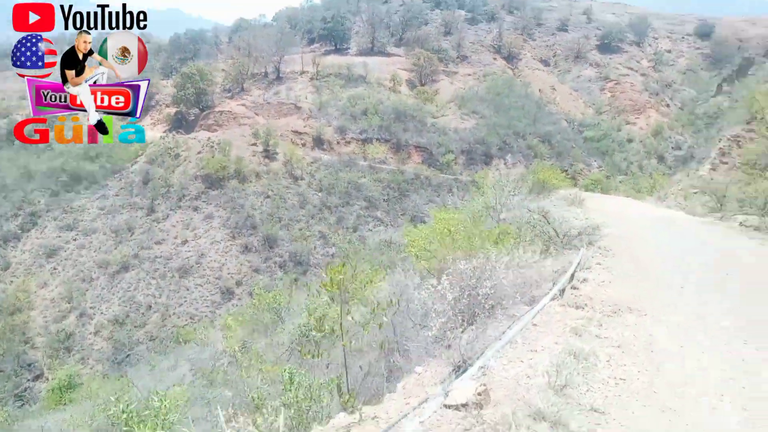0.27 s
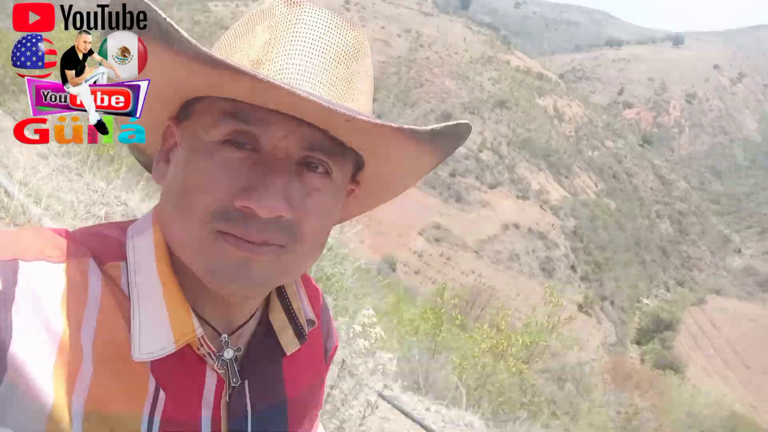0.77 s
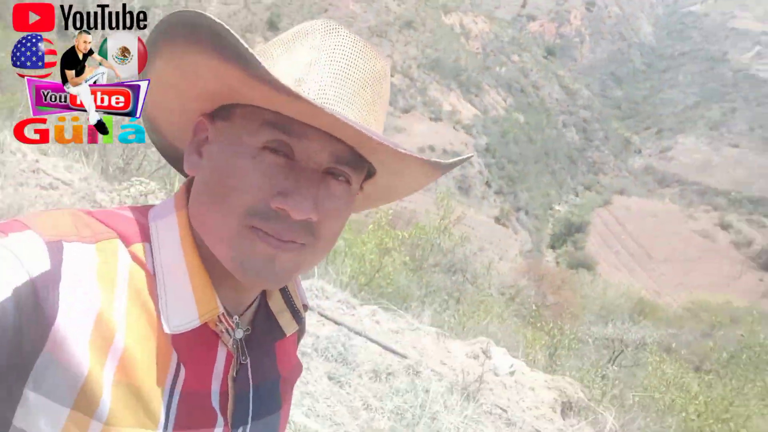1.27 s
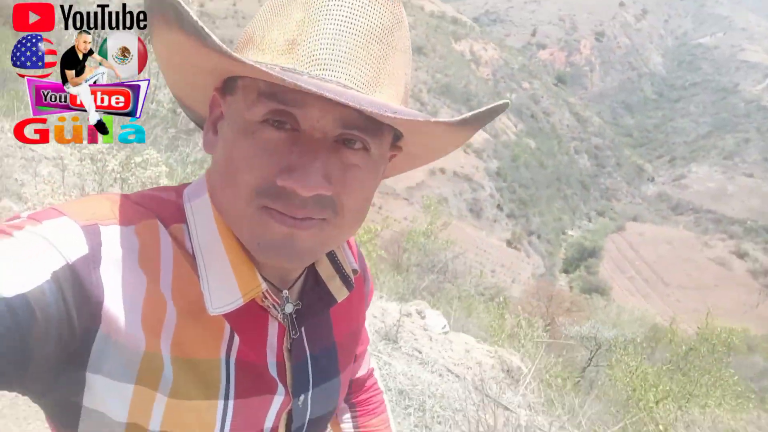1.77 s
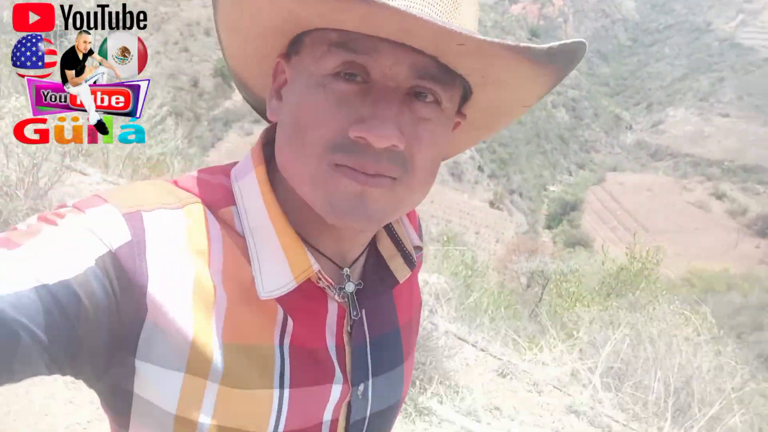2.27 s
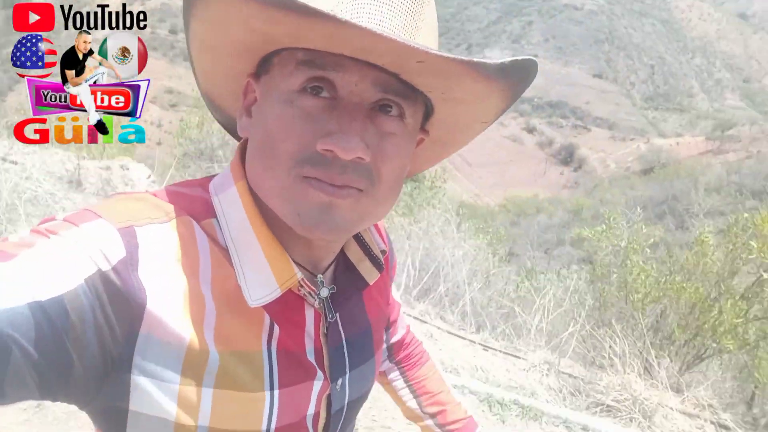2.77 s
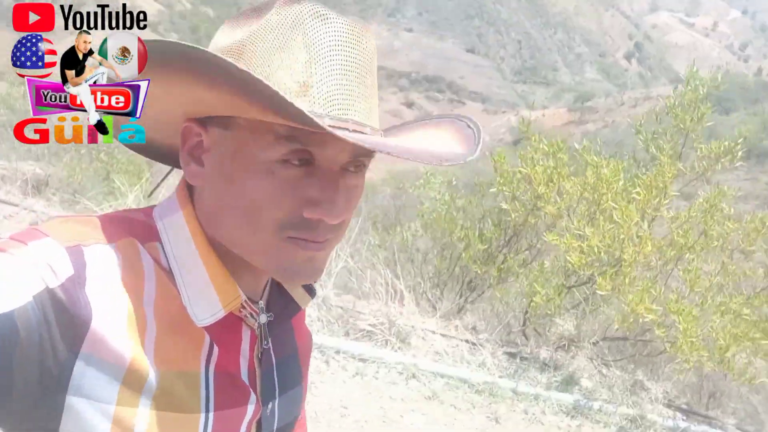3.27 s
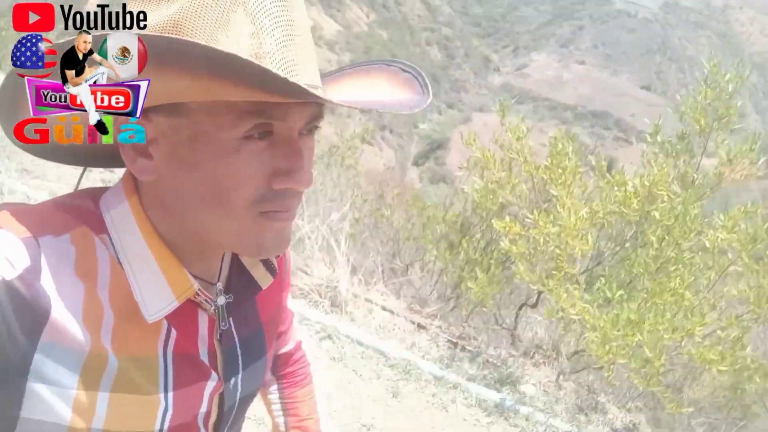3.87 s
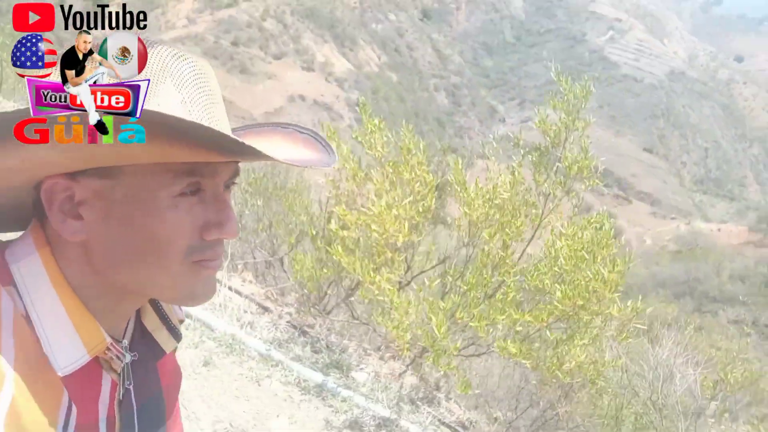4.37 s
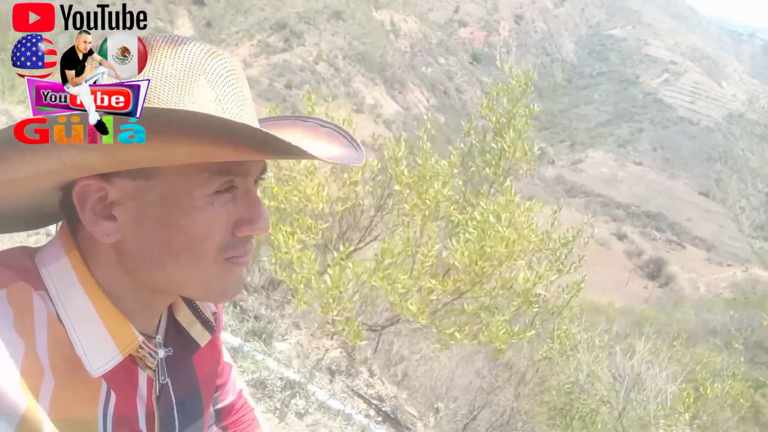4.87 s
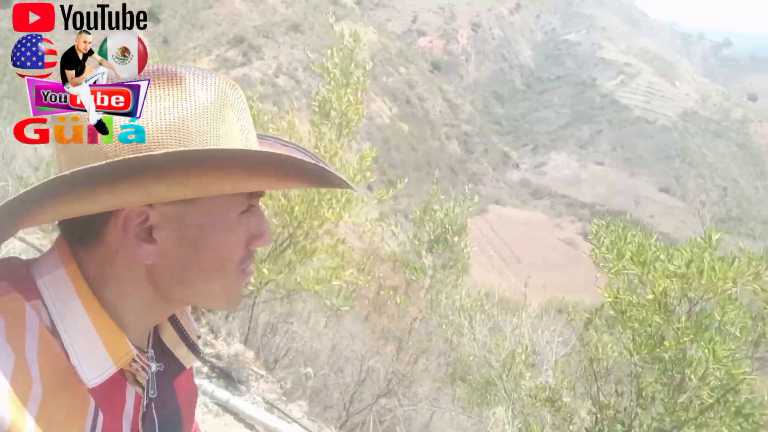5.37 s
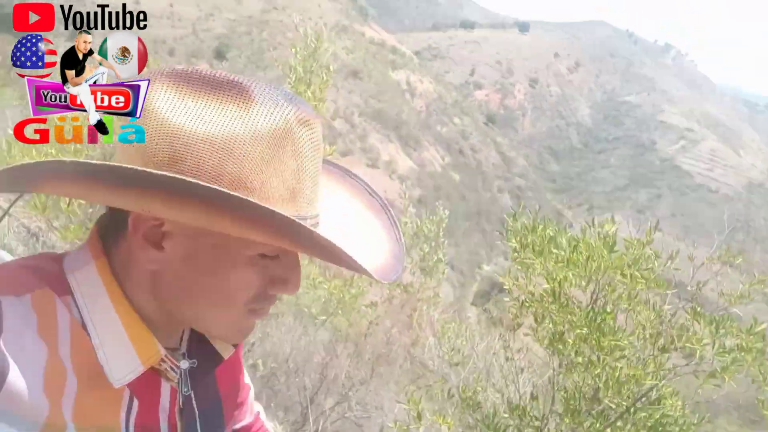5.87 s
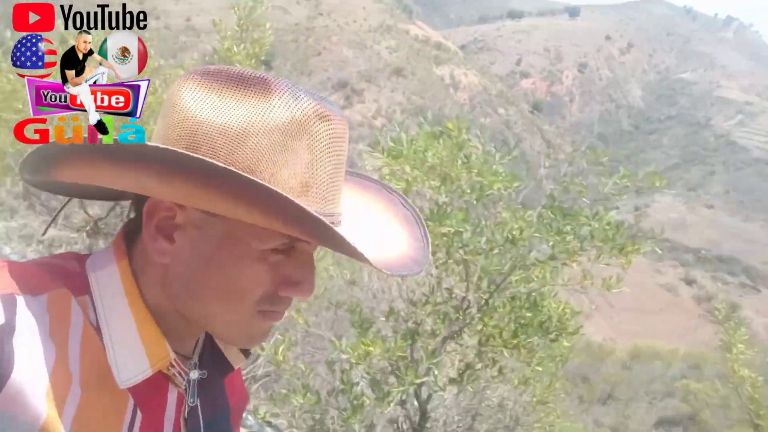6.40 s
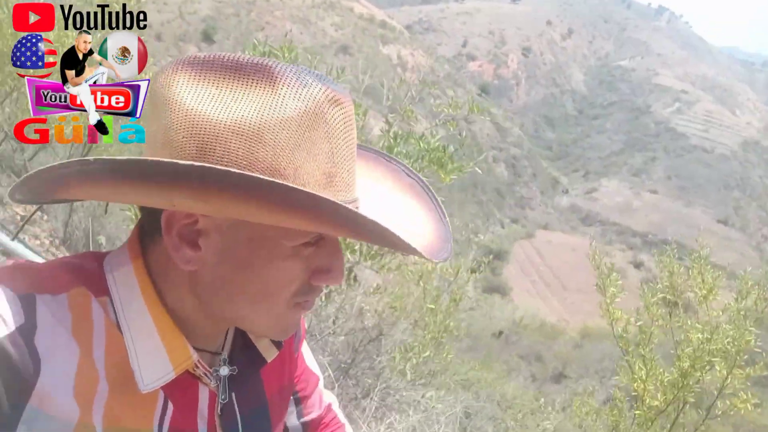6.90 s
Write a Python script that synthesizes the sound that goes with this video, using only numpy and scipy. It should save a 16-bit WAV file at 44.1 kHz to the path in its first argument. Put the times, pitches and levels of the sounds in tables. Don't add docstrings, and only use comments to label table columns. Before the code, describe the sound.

Slow footsteps crunch on gravel, a hard knock hits the handheld microphone, then after a brief silence heavy wind rumbles and slaps over continuing steps.

```python
import sys
import numpy as np
from scipy import signal
from scipy.fft import rfft, irfft
from scipy.io import wavfile
from scipy.ndimage import uniform_filter1d, minimum_filter1d

SR = 44100
rng = np.random.default_rng(int(sys.argv[2]) if len(sys.argv) > 2 else 0)


def volts_from_db(level):
    exponent = np.asarray(level, float) / 20
    return 10 ** exponent


def master_out(mix):
    frames = np.transpose(np.atleast_2d(mix))
    ceiling = np.clip(frames, -1, 1)
    pcm = np.round(ceiling * 32767).astype(np.int16)
    wavfile.write(sys.argv[1], SR, pcm)


N = 314874
TIME = np.arange(N) / SR
PORT_LAG = 5
KNOCK_S = .4572
CUT_S, FADE_OUT_S, GAP_S, FADE_IN_S = .652, 0.017, 0.031, 0.16


# (time [s], rumble level [dB], eddy breaking re rumble [dB])
AIRFLOW_LEFT = [(0.0, -43.5, -1), (.2, -41.5, -36), (.55, -54, -56), (.66, -27.5, -2), (1.0, -26, -16),
                (1.5, -25.5, -14), (1.65, -32.5, -39), (1.77, -30, -13.5), (2.1, -33.5, -31.5),
                (2.45, -29.5, -35), (3.08, -27.5, -22), (3.2, -20.5, -3.5), (4.2, -24.5, -13),
                (4.62, -18, -10), (5.2, -22.5, -10.5), (5.94, -24, -14.5), (6.3, -19, -3.5),
                (7.04, -18, -4.5)]
AIRFLOW_RIGHT = [(0.0, -33.5, -3), (.15, -48.5, 14), (.4, -36.5, -23), (.56, -34.5, -31), (.67, -49, -4),
                 (.78, -49, -23), (1.0, -42.5, 1), (1.22, -47, 4.5), (1.45, -41, -36), (1.9, -41.5, -34),
                 (2.5, -43, -19.5), (2.95, -33.5, -15), (3.15, -29, 10.5), (4.05, -32.5, -0.5),
                 (4.6, -29.5, -15.5), (5.2, -39.5, -13.5), (6.3, -44.5, -32), (7.04, -39.5, -36.5)]
# (time [s], half length [s], lift [dB])
GUSTS_AT_LEFT = [(0.902, 0.054, 6), (1.421, 0.027, 4), (1.894, 0.15, 11.5), (2.412, 0.027, -4),
                 (2.624, 0.041, 9), (3.311, 0.074, 7.5), (3.505, 0.019, -2.5), (3.63, 0.047, 2),
                 (4.082, 0.054, -0.5), (4.495, 0.1, 1), (4.78, 0.058, 3), (4.848, 0.026, 4),
                 (4.882, 0.014, 3.5), (5.016, 0.036, 5.5), (5.264, 0.086, -3), (5.464, 0.31, 4.5),
                 (6.092, 0.034, 0), (6.43, 0.17, 3.5), (6.54, 0.0068, -4.5), (6.581, 0.011, -5.5),
                 (6.592, 0.18, 3), (6.646, 0.0053, -8), (6.706, 0.019, -4.5), (6.758, 0.02, -1.5),
                 (6.826, .008, -3.5), (6.843, 0.067, 3), (6.935, 0.025, -5), (6.977, 0.0066, -3),
                 (7.053, 0.21, 5.5), (7.094, 0.0066, -5),
                 (0.782, 0.011, -5), (0.926, 0.015, 1.5), (0.944, 0.012, -12.5), (0.97, 0.01, 2.5),
                 (1.007, 0.012, 7.5), (1.138, 0.047, 1), (1.188, 0.016, -9.5), (1.297, 0.018, -5),
                 (1.34, 0.015, 3), (1.398, 0.015, 4), (1.466, 0.0166, -14.5), (1.473, 0.038, 6.5),
                 (1.538, 0.0076, 2), (1.622, 0.027, -8), (1.908, 0.036, 4), (1.99, 0.019, -0.5),
                 (2.105, 0.018, 13), (2.163, 0.045, -6), (2.225, 0.024, 10), (2.257, 0.016, -8),
                 (2.303, 0.0075, -12), (2.335, 0.016, 6), (2.596, 0.028, -4.5), (2.73, 0.012, 3),
                 (2.816, 0.031, -8.5), (2.926, 0.018, 7.5), (2.939, 0.008, -11), (3.023, 0.023, -5),
                 (3.177, 0.016, 2), (3.385, 0.0086, 5), (3.634, 0.026, 5.5), (3.756, 0.019, 8),
                 (3.84, 0.014, -4.5), (3.999, 0.085, 5), (4.088, 0.0043, 7.5), (4.164, 0.037, 3.5),
                 (4.423, 0.02, -1), (4.479, 0.027, 5), (4.656, 0.042, -8.5), (4.686, 0.016, 4.5),
                 (4.784, 0.013, 4.5), (4.856, 0.012, 3), (4.914, 0.0092, 5), (5.043, 0.01, 7),
                 (5.234, 0.02, 5), (5.341, 0.0079, 4.5), (5.51, 0.014, -7.5), (5.572, 0.019, 1.5),
                 (5.664, 0.015, -0.5), (5.837, 0.01, 3), (5.899, 0.022, -4.5), (5.945, 0.054, 4),
                 (6.125, 0.038, 7), (6.146, 0.023, -8.5), (6.376, 0.024, 4.5), (6.736, 0.019, 4),
                 (7.016, 0.0076, -10)]
GUSTS_AT_RIGHT = [(1.696, 0.12, 2), (2.096, 0.057, 7), (2.214, 0.061, 11), (2.413, 0.044, 4.5),
                  (2.53, 0.069, 3.5), (2.773, 0.2, 5.5), (2.992, 0.13, -6.5), (3.308, 0.046, -8),
                  (3.436, 0.065, 5.5), (3.635, 0.073, 1.5), (4.224, .1, -2), (4.386, 0.066, 0.5),
                  (4.909, 0.16, 8), (5.399, 0.11, 4), (5.608, 0.082, -5.5), (5.743, 0.19, 9.5),
                  (6.4, 0.061, 3.5), (6.576, 0.073, -15.5), (6.824, 0.057, 6.5)]
# (time [s], peak level [dB], pitch [Hz])
EDDY_SLAPS = [(0.968, -17.5, 227), (1.083, -13, 99), (1.481, -13, 212), (1.812, -12.5, 199),
              (1.886, -9.5, 164), (2.895, -19.5, 184), (3.173, -13, 259), (3.304, -10, 153),
              (3.379, -6, 233), (3.616, -15.5, 148.5), (3.742, -13.5, 161), (3.798, -16.5, 180),
              (3.97, -25, 167), (4.459, -8.5, 129), (4.563, -13.5, 144), (4.693, -13, 238),
              (4.761, -21, 195), (4.939, -11.5, 176), (5.046, -16.5, 188), (5.12, -14.5, 102.5),
              (5.328, -14.5, 166), (5.539, -15.5, 175), (5.971, -10.5, 190), (6.095, -11.5, 150),
              (6.246, -12, 220), (6.285, -6, 146), (6.553, -1, 220), (6.727, -14, 225), (6.868, -19, 300),
              (6.915, -6.5, 205), (6.952, -7, 342)]
# (time [s], peak level [dB], pitch [Hz], left minus right [dB])
WIND_POPS = [(0.157, -32.5, 1160, 11), (0.196, -32, 414, -31), (1.015, -29, 600, -28),
             (1.137, -28.5, 390, -22), (1.155, -30.5, 497, -11), (1.234, -24.5, 596, -23),
             (1.395, -20.5, 329, 35.5), (1.777, -32, 482, 28), (1.889, -27, 358, 37),
             (2.078, -39, 474, -26), (2.207, -31.5, 800, -15), (2.493, -39, 534, -23),
             (2.907, -28.5, 336, 19), (3.088, -31.5, 520, -19), (3.263, -22.5, 593, -6),
             (3.304, -11.5, 358, 16), (3.332, -8, 408, 23), (3.37, -22, 499, 10), (3.422, -24, 603, -1),
             (3.551, -28.5, 537, -9.5), (4.072, -24, 455, -16), (5.05, -16, 411, 38),
             (5.231, -23.5, 450, 19), (5.537, -28, 394, 24), (5.611, -31, 554, 34), (5.961, -24, 368, 43),
             (6.112, -14.5, 330, 53), (6.352, -12, 427, 33), (6.384, -14, 536, 39.5),
             (6.45, -16.5, 450, 49), (6.49, -10, 426, 62), (6.548, -15, 408, 50), (6.598, -31, 387, 51),
             (6.694, -13.5, 452, 64), (6.731, -7, 353, 54), (6.838, -13, 390, 35.5),
             (6.863, -13.5, 440, 45), (6.954, -16.5, 424, 48.5), (6.998, -19.5, 620, 56),
             (7.068, -11, 482, 55)]


def wind():
    slaps, pops = np.zeros(N), np.zeros((2, N))
    for s, db, hz in EDDY_SLAPS:
        add_cycles(slaps, s, hz, .45, volts_from_db(db + 2.5))
    for s, db, hz, pan_db in WIND_POPS:
        add_cycles(pops, s, hz, .35, volts_from_db(db - 0.5) * sides(pan_db)[:, None])
    harder = 0.89
    left = port(*flow(AIRFLOW_LEFT, GUSTS_AT_LEFT, harder)) + slaps
    right = port(*flow(AIRFLOW_RIGHT, GUSTS_AT_RIGHT, harder))
    return np.array([left, right]) + band(pops, 64.0, 1700.0)


def flow(curve, gusts, harder):
    s, db, break_db = np.transpose(curve)
    lift_db = sum(lift * np.exp(-((TIME - middle) / half) ** 2) for middle, half, lift in gusts)
    return np.interp(TIME, s, db) + lift_db, np.interp(TIME, s, break_db) + harder * lift_db


# (frequency [Hz], level [dB])
RUMBLE_TONE = [(25, -41.5), (50, -7.5), (80, 1.5), (130, 3), (220, -3.5), (350, -18), (600, -45),
               (1200, -86)]
# (frequency [Hz], level [dB])
EDGE_TONE = [(60, -31.5), (200, 4.5), (330, 1.5), (520, -10.5), (750, -20.5), (1100, -59), (2000, -92.5)]
# (frequency [Hz], level [dB])
SPIT_TONE = [(300, -26.5), (650, -2), (950, -12), (1400, -27), (2000, -44.5), (3200, -74)]


def port(rumble_db, edge_db):
    edge_db = np.minimum(edge_db, 2.5)
    burst, breaking = walk(26.), walk(60.)
    throb = volts_from_db(0.18 * burst + 1.3 * walk(11.))
    rumble = unit(colour(rng.standard_normal(N) * throb, RUMBLE_TONE), 71, 270)

    eddy_db = 2.2 * burst + 3.15 * breaking + 2.0 * walk(19.0)
    eddies = grains(700., 1.4) * volts_from_db(np.minimum(eddy_db, 9.))
    edge = unit(colour(eddies, EDGE_TONE), 267, 570)

    spit_drive = volts_from_db(np.minimum(1.6 * breaking + 0.92 * burst, 6.))
    spit = unit(colour(eddies * spit_drive, SPIT_TONE), 570, 1000)
    spit = spit * volts_from_db(1.87 * edge_db + 0.15 * rumble_db - 8.5)
    return volts_from_db(rumble_db) * (rumble * volts_from_db(-2.0) + volts_from_db(edge_db - 3.5) * (edge + spit))


# (frequency [Hz], level [dB])
CRUNCH_TONE_LEFT = [(150, -22), (500, 8), (1100, 11.5), (2000, 9.5), (2800, -1.5), (3800, -7), (5200, -23)]
CRUNCH_TONE_RIGHT = [(150, -12), (500, 14.5), (1000, 15), (2000, 2.5), (3200, 0), (4200, -16), (6000, -30)]
# (frequency [Hz], level [dB])
FINE_GRIT_TONE = [(3000, -44.5), (4500, 2.5), (5700, 5), (7400, -20.5), (9600, -7), (12000, -13),
                  (14500, -6.5), (16000, -34)]
# (time [s], length [s], level [dB], sharp grit re crunch [dB], left minus right [dB])
SOLE_ROLLS = [(0.0, 0.13, -50, -18, 18), (.2, 0.082, -56, -27, 0.5), (.37, 0.073, -65.5, -15, -4.5),
              (.47, 0.21, -45, -10.5, 6), (1.13, 0.095, -55, -23.5, 6), (1.665, 0.079, -56.5, -4.5, 6.5),
              (2.19, 0.13, -55, -15, 7), (2.715, 0.12, -56, -7, 10.5), (3.23, 0.053, -55, -7, 5),
              (3.755, 0.071, -52.5, -10.5, 11), (4.262, 0.053, -53, -11, 7.5), (4.78, 0.064, -63.5, -3, 6),
              (5.335, .02, -64, -16, 7.5), (5.8, 0.025, -49, -6, 8), (5.88, 0.0059, -67.5, -3.5, 9.5),
              (6.3, 0.033, -56.5, -13.5, 8), (6.85, 0.026, -64, -25.5, 9.5)]


def steps():
    crunch, sharp = load()
    rolls = np.array(SOLE_ROLLS)
    level = crunch * volts_from_db(-4.0) * sides(np.interp(TIME, rolls[:, 0], rolls[:, 4]))
    slips = volts_from_db(2.6 * walk(130.))
    grit = grains(3200., 4.2) * slips
    other = 0.81 * np.roll(grit, PORT_LAG) + 0.52 * grains(3600.0, 3.1) * slips

    fine = grains(5100.0, 2.3) * slips ** 1.2 * volts_from_db(4.0 * walk(70.))
    fine = unit(colour(fine, FINE_GRIT_TONE), 3500, 8300)
    fine = fine * sharp / (crunch + 1e-12)

    both = clumps(np.array([grit, other]))
    grit, other = both + volts_from_db(4.) * (TIME < CUT_S) * band(both, 2900., 6300.0)
    left = unit(colour(grit, CRUNCH_TONE_LEFT), 1747, 4000) + fine * volts_from_db(-2.5)
    right = unit(colour(other, CRUNCH_TONE_RIGHT), 1800, 4500) + np.roll(fine, PORT_LAG) * volts_from_db(-23)
    return level * np.array([left, right])


# (time [s], peak level [dB], rise time [s], sharp grit re crunch [dB])
HEEL_STRIKES = [(0.076, -64, 0.061, -26), (.449, -80, 0.016, -15), (0.547, -42, 0.041, -32),
                (1.121, -45.5, 0.021, -15), (1.658, -39, 0.021, -7), (2.185, -45, 0.034, -5.5),
                (2.706, -44, 0.02, -11.5), (3.12, -55.5, 0.1, -6), (3.207, -38.5, 0.028, -6.5),
                (3.341, -57.5, 0.045, -23.5), (3.736, -45, 0.032, -9), (4.238, -40.5, 0.026, -5),
                (4.737, -53.5, 0.023, -9), (4.775, -54.5, 0.081, 0), (5.161, -40.5, 0.02, 5),
                (5.269, -56.5, 0.17, -6), (5.339, -55.5, 0.12, -16), (5.794, -37, 0.011, -8),
                (5.877, -49, 0.025, -22), (6.294, -43.5, 0.02, -7.5), (6.399, -59.5, 0.04, -8),
                (6.842, -54, 0.038, -22.5)]


def load():
    both = np.zeros((2, N))
    for s, db, rise, sharp_db in HEEL_STRIKES:
        on = slice(max(int((s - 2 * rise) * SR), 0), int((s + 4 * rise) * SR))
        age = (TIME[on] - s) / rise
        drop_db = 33.5 * np.maximum(-age, age / 0.72)
        both[:, on] += volts_from_db(db - drop_db + np.array([[0], [min(sharp_db, -3)]]))
    rise_db_s, sag_db_s, lift_off_db_s = 1499, 42.5, 260
    for s, length, db, sharp_db, _ in SOLE_ROLLS:
        on = slice(max(int((s - .05) * SR), 0), int((s + length + .3) * SR))
        age = TIME[on] - s
        drop_db = np.maximum(-rise_db_s * age, sag_db_s * age)
        drop_db = drop_db + lift_off_db_s * np.maximum(age - length, 0)
        both[:, on] += volts_from_db(db - drop_db + np.array([[0], [min(sharp_db, -3)]]))
    return both


def clumps(x):
    lows = [0 * x]
    for hz in 500 * np.sqrt(2) ** np.arange(7):
        lows.append(signal.lfilter(*signal.butter(2, hz, fs=SR), x))
    lows.append(x)
    return sum((upper - lower) * volts_from_db(4.1 * walk(85.)) for lower, upper in zip(lows, lows[1:]))


# (time [s], peak level [dB], pitch [Hz])
STONE_CRACKS = [(0.031, -31, 1830.0), (0.0389, -44, 1550.0), (0.0676, -32, 1730), (0.0736, -30, 1350),
                (0.5202, -30, 1890.0), (0.5478, -33, 1230), (0.5936, -46, 1610.0), (1.1135, -42.5, 2060),
                (1.1713, -39, 1650), (1.2334, -41, 1230), (1.651, -36, 2200), (1.662, -36, 1050),
                (2.185, -38, 2000.0), (2.3053, -55, 1740.0), (2.3225, -46, 1740), (2.7783, -46, 1420),
                (2.8445, -51, 1680.0), (3.089, -54, 1770.0), (3.1077, -52, 1680.0), (3.1173, -54, 1980.0),
                (3.204, -32.5, 1830), (3.2752, -44.5, 1823), (3.339, -36, 1207), (3.7335, -39.0, 2110.0),
                (3.758, -48, 1990), (3.764, -43, 1500), (3.7946, -46, 2090.0), (4.2317, -44, 1230.0),
                (4.2393, -41, 1720.0), (4.264, -41.0, 1660.0), (4.3058, -35.5, 1620), (4.3215, -49, 2090.0),
                (4.7376, -50, 2000), (4.821, -52, 1380.0), (5.1184, -54, 1341), (5.1586, -43.5, 1900),
                (5.3335, -41, 1790.0), (5.355, -39, 1434), (5.3628, -42, 1590.0), (6.2843, -41, 1680),
                (6.2957, -34, 1650)]
# (time [s], peak level [dB], pitch [Hz])
PEBBLE_TAPS = [
    (.933, -61, 1410),
    (1.012, -59, 1580),
    (1.529, -45.5, 1410),
    (1.542, -60.5, 1710),
    (2.134, -54, 1540),
    (2.45, -44, 1730),
    (2.468, -50, 950),
    (2.521, -57, 2060),
    (6.8143, -50.5, 5500),
    (6.839, -43, 2100),
]
# (time [s], peak level [dB], pitch [Hz])
EDDY_SPITS = [(6.3775, -38, 1210.0), (6.387, -30, 1210.0), (6.3976, -39, 1400.0), (6.7434, -49.5, 1450),
              (6.8372, -35.5, 1400), (6.8686, -28, 1230), (6.9986, -32, 1260), (7.0712, -36.5, 1400.0),
              (7.113, -45, 1200), (7.125, -34, 1350), (6.613, -43, 1400), (6.63, -39.5, 1400),
              (6.662, -42, 1400), (3.425, -41, 1500), (3.513, -44, 1400), (3.558, -43, 1400),
              (3.603, -44, 1450), (3.662, -44, 1400)]
# (time [s], level [dB])
LEFT_TICKS = [
    (0.707, -26.5),
    (.7185, -38.5),
    (.728, -37),
    (.748, -38),
    (.799, -51),
    (0.82, -55),
    (.839, -41.5),
    (.8655, -38.5),
    (0.909, -40.5),
    (.919, -41.5),
]


def cracks():
    stones, left = np.zeros(N), np.zeros(N)
    for s, db, hz in STONE_CRACKS:
        add_cycles(stones, s, hz, .7, volts_from_db(db + 1.5))
    for s, db, hz in PEBBLE_TAPS:
        add_cycles(stones, s, hz, 1.1, volts_from_db(db + 3.0))
    for s, db, hz in EDDY_SPITS:
        add_cycles(left, s, hz, .6, volts_from_db(db + 2.5))
    for s, db in LEFT_TICKS:
        left[int(s * SR)] += volts_from_db(db)
    return np.array([stones + band(left, 600., 9000.), np.roll(stones, PORT_LAG) * volts_from_db(-10)])


# (time [s], middle part [dB], low part [dB], top part [dB], left minus right [dB])
STONE_AND_GRIP_CLICKS = [(0.1974, -53, -49, -72, -11), (0.4569, -15.5, -34.5, -38, 11),
                         (0.4574, -15, -28, -60, -29.5), (0.4604, -36, -50, -36, -9),
                         (0.4630, -34, -55, -42, -3), (0.4755, -29, -53.5, -63, -16.5),
                         (0.4862, -25, -47, -43.5, -7.5), (1.651, -46, -45, -67, 8),
                         (1.6601, -34, -45, -39, -8), (2.133, -35, -63, -66, 25),
                         (2.1799, -41, -45, -59, 12), (2.699, -42, -62, -80, 12),
                         (2.7105, -39, -59, -80, 17), (4.0713, -44, -62, -59, 0),
                         (4.779, -39, -56.5, -81, 23), (4.975, -63, -48.5, -81.5, 4),
                         (5.8002, -43, -42, -74, -18.5), (5.8762, -24.5, -62, -76, 17),
                         (5.883, -39, -77, -77, 24), (5.8876, -29.5, -62, -68, 16),
                         (6.4726, -48.5, -67, -82, 11), (6.5384, -70, -69, -54.5, 6),
                         (6.7317, -39, -27, -63, 37), (6.7445, -52, -52, -79, 25),
                         (6.8165, -55.5, -43, -85, 11)]


def clicks():
    parts = np.zeros((3, 2, N))
    age = np.arange(1024) / SR / 0.0002
    envelope = (1 - np.exp(-4. * age)) * np.exp(-age)
    for s, mid_db, low_db, top_db, pan_db in STONE_AND_GRIP_CLICKS:
        shared, own = rng.standard_normal((2, 1024))
        burst = np.array([shared, np.roll(shared, PORT_LAG) + 0.59 * own]) * envelope
        levels = volts_from_db([low_db, mid_db, top_db])[:, None, None]
        start = int(s * SR)
        parts[:, :, start:start + 1024] += levels * sides(pan_db)[:, None] * burst
    low, mid, top = parts
    low = band(signal.lfilter(*signal.butter(2, 2300., fs=SR), low), 540.0, 2300.0)
    mid = band(band(mid, 2300., 6100.0), 2300., 6100.0)
    top = band(band(top, 8600.0, 19000.0), 8600.0, 19000.0)
    return volts_from_db(16.5) * low + volts_from_db(9.0) * mid + volts_from_db(18.5) * top


# (time [s], level [dB], bend time [s], cycles per e-fold [cycles], fading power [1])
CASE_KNOCK = [
    (0.4571, -9, 0.00036, 0.49, 0.72),
    (0.4578, 2.5, 0.00094, 1.094, 0.8),
]


def knock():
    out = []
    for s, db, bend, cycles, fading in CASE_KNOCK:
        elapsed = np.maximum(TIME - s, 0)
        age = 1 + elapsed / bend
        wave = np.sin(2 * np.pi * cycles * np.log(age))
        out.append(volts_from_db(db) * wave * age ** -fading * np.exp(-(elapsed / 0.025) ** 2))
    return np.array(out)


# (time [s], level [dB])
SONG_LEVEL = [
    (.74, -91),
    (.9, -75),
    (1.1, -82),
    (1.3, -82),
    (1.37, -92),
    (1.5, -72.5),
    (1.65, -86),
    (1.9, -85.5),
    (2.05, -81),
    (2.3, -100),
]
# (frequency [Hz], level [dB])
WING_COMB = [(6520, -96), (6890, -94), (8678, -92), (9055, -89), (9415, -98), (9780, -99)]
# (time [s], level [dB])
WING_BUZZ = [
    (.76, -1.5),
    (.93, 13.5),
    (1.06, 2),
    (1.15, 0),
    (1.25, 10),
    (1.35, -15.5),
    (1.55, -4),
    (1.7, -13),
    (2.05, -12.5),
    (2.2, -26),
]


def insect():
    def curve(rows):
        return np.interp(TIME, *np.transpose(rows), left=-150, right=-150)

    def line(hz):
        return np.sin(2 * np.pi * hz * TIME + 1.1 * walk(60.0))

    pulse_db = np.minimum(4.5 * walk(110.), 3) - 1
    comb = sum(volts_from_db(db + 2.2 * walk(11.0)) * line(hz) for hz, db in WING_COMB)
    song = line(8317) * volts_from_db(curve(SONG_LEVEL)) + comb * volts_from_db(curve(WING_BUZZ))
    return song * volts_from_db(pulse_db) * volts_from_db(np.array([[4.], [-30.]]))


def colour(x, points):
    hz, db = np.transpose(points)
    bins_hz = np.linspace(1, SR / 2, 4097)
    log_gain = np.interp(np.log(bins_hz), np.log(hz), db) * np.log(10) / 20
    fold = irfft(log_gain) * np.r_[1, 2 * np.ones(4095), 1, np.zeros(4095)]
    return signal.fftconvolve(x, irfft(np.exp(rfft(fold))))[:len(x)]


def band(x, lo_hz, hi_hz):
    edges_hz = [lo_hz, min(hi_hz, SR / 2.2)]
    return signal.sosfilt(signal.butter(2, edges_hz, "band", fs=SR, output="sos"), x)


def unit(x, lo_hz, hi_hz):
    return x / np.std(band(band(x, lo_hz, hi_hz), lo_hz, hi_hz))


def walk(rate):
    k = int(SR / rate)
    held = np.repeat(rng.standard_normal(N // 64), k)[:N]
    slewed = uniform_filter1d(uniform_filter1d(held, k), k)
    return slewed / np.std(slewed)


def grains(rate, scatter_db):
    hit = rng.random(N) < rate / SR
    size_db = scatter_db * np.minimum(rng.exponential(size=N), 2.6)
    return hit * rng.standard_normal(N) * volts_from_db(size_db)


def sides(pan_db):
    return 2 / (1 + volts_from_db(np.array([-pan_db, pan_db])))


def add_cycles(out, s, hz, cycles, gain):
    start = int(s * SR)
    turns = np.arange(min(int(16 * cycles / hz * SR), N - start)) * hz / SR
    envelope = (np.e * turns / cycles / 2) ** 2 * np.exp(-turns / cycles)
    out[..., start:start + len(turns)] += gain * envelope * np.sin(2 * np.pi * turns)


def scene():
    return wind() + steps() + cracks() + clicks() + knock() + insect()


def low_pass(x):
    return signal.sosfilt(signal.butter(12, 16360, fs=SR, output="sos"), x)


# (frequency [Hz], level [dB])
HISS_TONE = [(300, 2), (1000, -1.5), (2500, -9), (5000, -11.5), (8000, -15.5), (11000, -11), (15000, -12),
             (16000, -15)]


def record(dry):
    x = signal.sosfilt(signal.butter(2, 54, "high", fs=SR, output="sos"), dry)
    x = x - (TIME < KNOCK_S) * band(x, 108.0, 474.0)

    hiss = np.array([colour(rng.standard_normal(N), HISS_TONE) for _ in range(2)])
    hiss_db = -72 + (TIME < CUT_S) * np.array([[5.], [1.5]])
    fade_out = (CUT_S - TIME) / FADE_OUT_S
    fade_in = (TIME - CUT_S - GAP_S) / FADE_IN_S
    fade = np.clip(np.maximum(fade_out, fade_in), 0, 1)
    fade = fade * np.clip((N / SR - TIME) / .005, .2, 1)
    x = fade * (x + volts_from_db(hiss_db) * hiss / np.std(hiss))

    room = np.minimum(1, .95 / (np.abs(x).max(axis=0) + 1e-9))
    x = x * uniform_filter1d(minimum_filter1d(room, size=441), size=441)
    x = signal.sosfilt(signal.ellip(10, .3, 70, 15750, fs=SR, output="sos"), x)
    return low_pass(x)


dry = scene()
out = record(dry)
master_out(out)
```